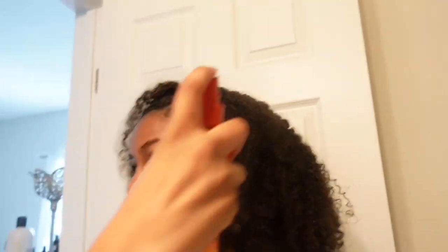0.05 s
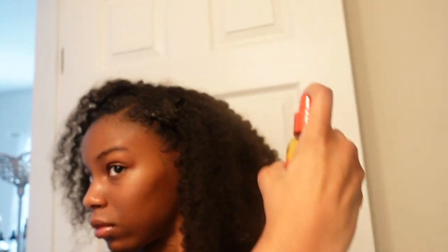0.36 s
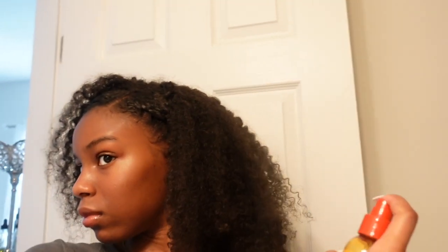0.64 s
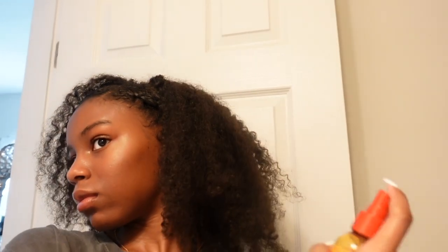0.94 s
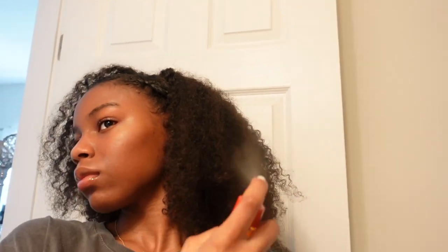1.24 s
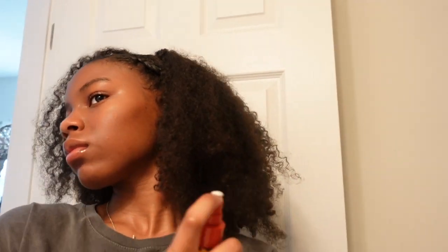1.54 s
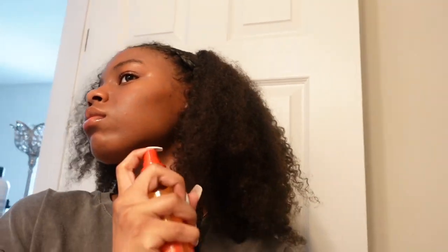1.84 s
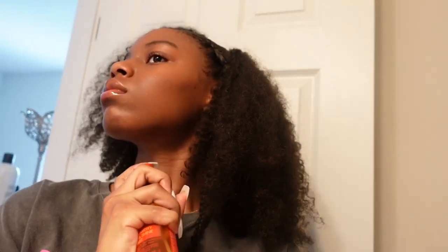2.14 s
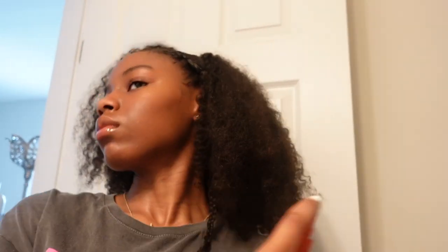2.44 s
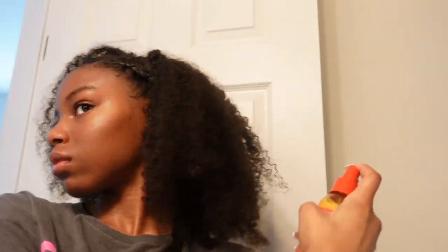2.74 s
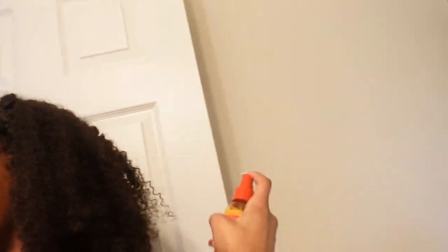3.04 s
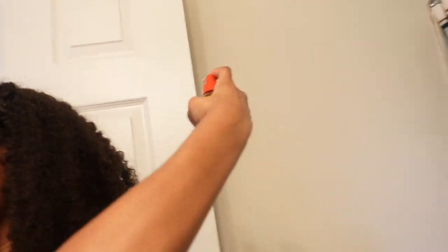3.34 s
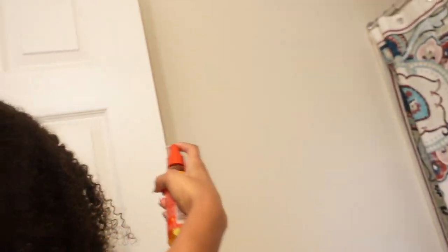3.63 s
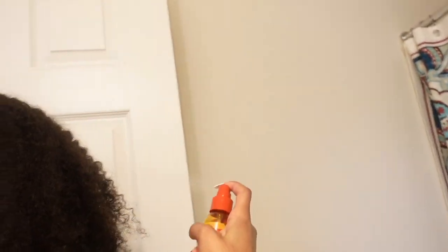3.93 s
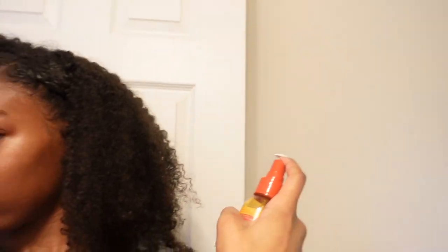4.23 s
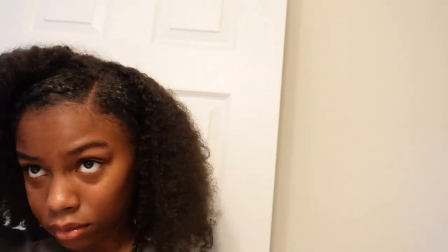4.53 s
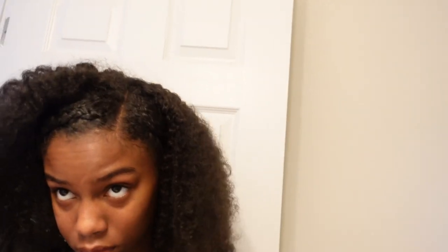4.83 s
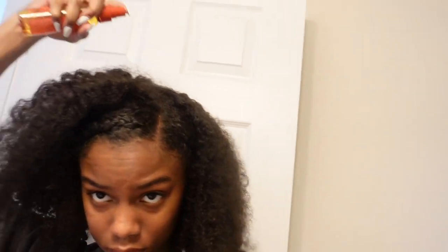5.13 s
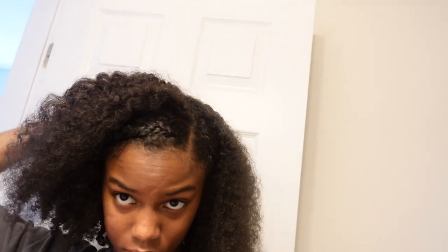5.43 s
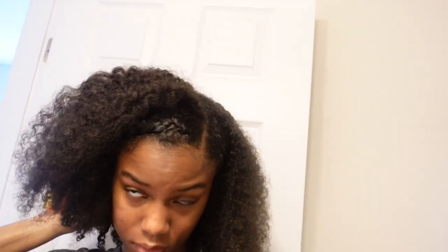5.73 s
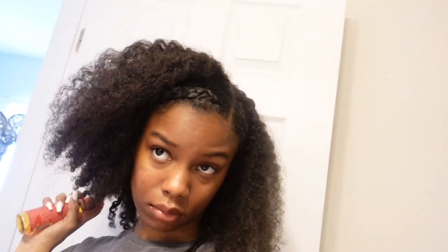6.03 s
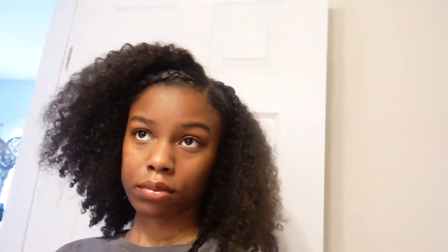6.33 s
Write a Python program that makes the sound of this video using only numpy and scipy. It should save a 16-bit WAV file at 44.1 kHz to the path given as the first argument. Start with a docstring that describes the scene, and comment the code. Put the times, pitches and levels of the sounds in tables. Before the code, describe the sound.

Quick, repeated spritzes from a hand-pump spray bottle, each a brief hiss amid ticking plastic, over faint indoor room tone.

```python
"""Pump spray in a bedroom

A small plastic pump bottle is sprayed sixteen times close to a stereo microphone, almost straight ahead.
The finger takes up the slack with a tick, the jet hisses and turns to fine mist as pressure builds, and
the plunger slides back to its stop and twangs the spring. The liquid plops, the seal squeaks and, mostly
late on, the bottle knocks in the hand. An appliance hum and faint room tone lie underneath."""
import sys
import numpy as np
from scipy import signal
from scipy.fft import rfft, irfft, next_fast_len
from scipy.io import wavfile
from scipy.ndimage import uniform_filter1d, map_coordinates

SR = 44100
rng = np.random.default_rng(int(sys.argv[2]) if len(sys.argv) > 2 else 0)


def master_out(mix):
    """Clip the mix to full scale and print it as 16-bit PCM to the path in sys.argv[1]."""
    frames = np.transpose(np.atleast_2d(mix))
    ceiling = np.clip(frames, -1, 1)
    pcm = np.round(ceiling * 32767).astype(np.int16)
    wavfile.write(sys.argv[1], SR, pcm)


N = 289737
T = np.arange(N) / SR
SIDE = np.array([[1], [-1]])   # adds to the left channel, subtracts from the right


def from_db(db):
    """Decibels to gain."""
    return 10 ** (np.asarray(db) / 20)


def rms_one(x):
    """Scale to rms 1."""
    return x / np.sqrt(np.mean(x ** 2) + 1e-20)


def at_hz(points, hz):
    """Read a table on a log-frequency axis."""
    rows = np.array(points, float)
    return np.interp(np.log(np.maximum(hz, 1)), np.log(rows[:, 0]), rows[:, 1])


def butter(x, order, hz, kind):
    """Apply a Butterworth filter."""
    return signal.sosfilt(signal.butter(order, hz, kind, fs=SR, output="sos"), x)


def colour(x, gain_at):
    """Filter by a gain that is a function of frequency."""
    size = next_fast_len(x.shape[-1])
    gain = gain_at(np.fft.rfftfreq(size, 1 / SR))
    return irfft(rfft(x, size) * gain, size)[..., :x.shape[-1]]


def noise(spectrum):
    """Noise of a given spectrum, rms 1."""
    return rms_one(colour(rng.standard_normal(N), lambda hz: from_db(at_hz(spectrum, hz))))


def drift(rate_hz):
    """A smooth random wander, rms 1."""
    return rms_one(colour(rng.standard_normal(N), lambda hz: 1 / (1 + (hz / rate_hz) ** 2)))


def gate(t, length_s, attack_s, release_s):
    """An envelope that rises, holds until length_s and dies away."""
    return (1 - np.exp(-t / attack_s)) * np.exp(-np.maximum(t - length_s, 0) / release_s)


def ring(x, hz, t60):
    """One damped mode: a unit click sets a sine of height 1 ringing."""
    radius, angle = from_db(-60 / (t60 * SR)), 2 * np.pi * hz / SR
    return signal.lfilter([0, np.sin(angle)], [1, -2 * radius * np.cos(angle), radius ** 2], x + 1e-18)


def add(track, s, sound):
    """Mix a sound into a track at time s."""
    at = int(np.clip(round(s * SR), 0, N - 1))
    track[at:at + len(sound)] += sound[:N - at]


def moving_echo(x, delay_s, sway, share):
    """A reflection off hand, head or door; its path changes as the arm moves."""
    lag = delay_s * np.exp(sway * drift(0.47)) * SR
    return share * map_coordinates(x, [np.arange(N) - lag], order=3)


def strike(contacts, modes, cycles, rattle_s, body_db, reach_octaves, snap_hz, crest_db):
    """A contact and its tiny rebounds snap, and ring one damped pitch and the modes near it."""
    out, t = np.zeros(N), np.arange(SR // 7) / SR
    for s, db, hz, snap_db, rattle_db in contacts:
        force = from_db(rattle_db - 14.5) * rng.standard_normal(len(t))
        force *= np.exp(-t / rattle_s) * (t > 0.001)
        force[0] = 1   # the contact itself, ahead of the rattle
        snap = from_db(snap_db + 6) * butter(force, 2, [snap_hz, 6800], "band")
        sound = ring(force, hz, cycles / hz) + snap
        for mode_hz, mode_db, t60 in modes:
            nearness = 1 / (1 + (np.log2(mode_hz / hz) / reach_octaves) ** 2)
            grip_detune = 1 + rng.normal(0, 0.008)
            sound += nearness * from_db(body_db + mode_db) * ring(force, mode_hz * grip_detune, t60)
        onset_rms = np.std(sound[:SR // 200])
        add(out, s, from_db(db - crest_db) * sound / onset_rms)
    return out


# spectrum of the quiet bedroom: (frequency [Hz], level [dB])
ROOM_TONE_SPECTRUM = [(18, -34), (30, -24), (118, -5.5), (404, -3), (569, -2), (1160, -6), (1460, -5.5),
                      (1810, -7.5), (2170, -11.5), (4420, -16.5), (4780, -17), (5170, -18.5), (5900, -19.5),
                      (9220, -22.5), (16000, -29.5)]
# how alike it is at the left and right microphones: (frequency [Hz], coherence [0-1])
ROOM_TONE_COHERENCE = [(60, 0.5), (110, 0.64), (170, 0.08), (400, 0), (900, 0), (2000, 0), (8000, .4)]
def room_tone(level_db=-62.5):
    """Soft noise from all round the microphone, widest in the low mids."""
    def side_gain(hz):
        coherence = at_hz(ROOM_TONE_COHERENCE, hz)
        return np.sqrt((1 - coherence) / (1 + coherence))
    side = colour(noise(ROOM_TONE_SPECTRUM), side_gain)
    return from_db(level_db) * (noise(ROOM_TONE_SPECTRUM) + side * SIDE)


# swell and fade of the hum: (time [s], relative level [dB])
HUM_LEVELS = [(0.0, -73), (0.38, -85), (1.59, -66), (1.94, -79), (3.46, -75.5), (5.01, -85), (5.8, -66.5),
              (6.5, -70), (6.57, -80)]
def appliance_hum(hz=104, trim_db=-0.5, motor_db=-14):
    """An appliance in the background: a wavering hum with a faint line an octave below."""
    level_db = np.interp(T, *np.transpose(HUM_LEVELS)) + trim_db + 1.8 * drift(4.3)
    phase = 2 * np.pi * np.cumsum(hz + 2 * drift(5.9)) / SR
    return from_db(level_db) * np.sqrt(2) * (np.sin(phase) + from_db(motor_db) * np.sin(phase / 2))


# the finger takes up the slack: (time [s], tick level [dB], wait until the head seats [s])
TAKE_UPS = [(0.1612, -37, 0.045), (0.5385, -26, 0.018), (0.7939, -25.5, 0.019), (1.0927, -29, 0.0085),
            (1.8243, -27.5, 0.031), (2.1587, -25.5, 0.017), (2.727, -30.5, .048), (3.1005, -22.5, .007),
            (3.3711, -28.5, 0.02)]
# the plunger slides back to its stop:
# (stop time [s], slide length [s], relative slide level [dB], stop level [dB], twang level [dB])
RETURNS = [(0.488, 0.034, -45.5, -39, -45), (0.7357, 0.029, -44, -32.5, -49), (0.978, 0.036, -47, -31, -41),
           (1.5253, .1, -54.5, -30, -66), (2.0884, 0.04, -46.5, -38, -61), (2.3654, 0.023, -43, -31.5, -56),
           (3.024, 0.034, -48, -37, -47.5), (3.3026, 0.096, -48, -28, -57),
           (3.3968, 0.019, -52.5, -27, -60), (3.594, 0.027, -42, -52, -69), (3.69, .03, -53, -32, -64),
           (3.8798, 0.038, -44.5, -34, -58), (3.942, 0.025, -42.5, -29, -57), (4.143, 0.04, -46, -47, -62),
           (5.737, .015, -44.5, -43, -62), (6.213, 0.04, -49, -50, -62)]
def plunger(overrun_s=0.0035, take_up_s=0.023, take_up_db=-25):
    """The seal rubs along its barrel with a grainy hiss, on the way back and at each take-up."""
    slides = [(stop - length, length + overrun_s, db) for stop, length, db, *_ in RETURNS]
    slides += [(s, take_up_s, db + take_up_db) for s, db, _ in TAKE_UPS]
    level, t = np.zeros(N), np.arange(SR // 5) / SR
    for s, length, db in slides:
        add(level, s, from_db(db) * gate(t, length, attack_s=0.0049, release_s=0.014))
    return seal_rub(level)


# spectrum of the seal on its barrel: (frequency [Hz], level [dB])
RUB_SPECTRUM = [(400, -20.5), (1400, 0.5), (2300, 1.5), (3100, 4), (4500, -3), (7000, -1.5), (12000, -8.5),
                (16000, -27)]
def seal_rub(level):
    """Grainy friction noise that follows a level curve, with one close reflection."""
    rub = level * noise(RUB_SPECTRUM) * from_db(-4 + 3.3 * drift(190))
    return rub + moving_echo(rub, delay_s=0.000832, sway=0.21, share=0.4)


# the grip shifts or the head snaps down: (time [s], level [dB], pitch [Hz], relative snap [dB])
HANDLING_CLICKS = [(0.3008, -25, 1670, -20), (.466, -32.5, 4340, 18), (1.1014, -32, 3200, 20),
                   (1.1611, -31, 1250, -14), (1.2639, -25.5, 2380, 5), (1.42, -32.5, 1440, 7),
                   (1.5438, -31.5, 1110, 2), (1.6641, -29.5, 1404, 0), (1.699, -25, 1510, -8),
                   (1.7272, -32.5, 1480, 11), (2.2004, -22, 3440, -14), (2.9906, -31, 1410, -16),
                   (4.125, -25.5, 4250, 8), (4.7523, -26.5, 4700, -24), (4.7858, -29, 1800, -20),
                   (5.1724, -28, 2240, 6), (5.4436, -31.5, 2250, -18), (6.3333, -38, 3000, 10),
                   (6.55, -38.5, 3100, -5)]
# modes of the pump and cap: (frequency [Hz], level [dB], t60 [s])
PUMP_MODES = [(846, -26, 0.0095), (1380, -10, 0.056), (1510, -8, 0.012), (2265, -1.5, 0.037),
              (2860, -2, 0.059), (3050, 2.5, 0.014), (3210, 2.5, .018), (3680, 3, 0.008),
              (5140, 2.5, 0.015), (6470, -33, .012)]
def clicks():
    """Small stiff pump parts tick and die at once: bright at take-up, duller as they seat or stop."""
    # each contact: (time [s], level [dB], pitch [Hz], relative snap [dB], relative rattle [dB])
    ticks = [(s, db, 3300, -2, -9) for s, db, _ in TAKE_UPS]
    seats = [(s + wait, db - 4, 1680, -4, -3.5) for s, db, wait in TAKE_UPS]
    stops = [(s, db, 1500, 0, -14.5) for s, _, _, db, _ in RETURNS]
    handling = [(s, db, hz, snap_db, -10.5) for s, db, hz, snap_db in HANDLING_CLICKS]
    sound = strike(ticks + seats + stops + handling, PUMP_MODES, cycles=4.5, rattle_s=0.016,
                   body_db=-11, reach_octaves=0.68, snap_hz=2310, crest_db=16)
    return butter(sound, 2, 650, "high")


def spring(low_hz=1419, high_hz=2994, t60=0.1, low_db=-1.5, tick_db=-21.5):
    """Both modes of the coil ring on after a stop; a take-up tick stirs only the high one."""
    stops, ticks = np.zeros((2, N))
    for s, *_, db in RETURNS:
        add(stops, s, from_db([db]))
    for s, db, _ in TAKE_UPS:
        add(ticks, s, from_db([db + tick_db]))
    return from_db(low_db) * ring(stops, low_hz, t60) + ring(stops + ticks, high_hz, t60)


# liquid plopping in the bottle: (time [s], level [dB], starting pitch [Hz], swell [s])
PLOPS = [(.232, -40.5, 596, 0.015), (.38, -48.5, 580, 0.0039), (1.884, -46, 570, 0.0032),
         (2.201, -39, 736, 0.0032), (2.571, -46.5, 542, 0.0098), (2.979, -39.5, 483, .002),
         (2.983, -52.5, 172, 0.0018), (2.989, -48, 390, .001), (3.474, -41, 580, .002),
         (4.246, -44.5, 464, 0.00083), (4.25, -57, 162.7, .004), (4.538, -47.5, 505, .009)]
def plops(rise=0.48, decay_cycles=1.5):
    """An air pocket in the liquid swells, rings briefly and rises a little in pitch."""
    out, t = np.zeros(N), np.arange(SR // 12) / SR
    for s, db, hz, swell_s in PLOPS:
        swell = np.minimum(t / swell_s, 1) ** 0.33
        decay = np.exp(-np.maximum(t - swell_s, 0) * hz / decay_cycles)
        add(out, s, from_db(db) * swell * decay * np.sin(2 * np.pi * hz * t * (1 + rise * t)))
    return out


def flow(start, crest, end, open_db, crest_db, build_s, attack_s, shut_s, sag_db=6):
    """The valve opens, pressure builds to a crest, and the flow dies when the plunger bottoms out."""
    t = np.arange(int((end - start + 0.1) * SR)) / SR + start
    build = np.exp(np.minimum(t - crest + 0.005, 0) / build_s)
    sag = np.clip((t - crest) / (end - crest), 0, 1)
    level_db = open_db + (crest_db - open_db) * build - sag_db * sag
    return from_db(level_db) * gate(t - start, end - start, attack_s, shut_s)


# presses of the pump, in relative levels: (start [s], crest [s], end [s], opening jet [dB],
# crest jet [dB], opening mist [dB], crest mist [dB], sizzle [dB])
PRESSES = [(0.299, 0.35, 0.39, -42.5, -45.5, -49, -47, -55),
           (0.586, 0.622, 0.656, -40.5, -39.5, -45, -35.5, -31),
           (.836, 0.894, 0.92, -40.5, -42.5, -42, -41, -41),
           (1.268, 1.323, 1.365, -43, -40.5, -41.5, -40.5, -39),
           (1.914, 1.957, 2.016, -42, -45.5, -51, -41.5, -54),
           (2.202, 2.255, 2.277, -45, -39, -40.5, -37, -42),
           (2.842, 2.901, 2.958, -44, -39, -46, -41.5, -33),
           (3.146, 3.199, 3.208, -39, -39, -45, -32.5, -36),
           (3.419, 3.465, 3.523, -39, -43, -41.5, -42, -27),
           (3.716, 3.781, 3.82, -44.5, -39, -44, -38.5, -36),
           (3.96, 4.017, 4.065, -41, -36, -42.5, -39.5, -33.5),
           (4.939, 5.016, 5.05, -43.5, -38.5, -46, -39, -34.5),
           (5.212, 5.305, 5.41, -39, -42.5, -44.5, -51.5, -36),
           (5.479, 5.53, 5.64, -45, -39, -49.5, -47, -45),
           (5.765, 5.825, 5.89, -43.5, -43, -52, -42, -31.5),
           (6.028, 6.071, 6.12, -44.5, -44, -46.5, -40, -30.5)]
# spectra of the coarse drops, the jet and the mist at close range: (frequency [Hz], level [dB])
SPUTTER_SPECTRUM = [(100, -60), (300, -14), (600, -7.5), (900, -7), (1350, 0), (2000, 0), (2700, -10),
                    (5000, -48)]
JET_SPECTRUM = [(1300, -43), (2000, -7.5), (2600, -2), (3600, 0), (5000, 1), (6500, -1), (7800, -9.5),
                (9500, -5.5), (14000, -32)]
MIST_SPECTRUM = [(5000, -22.5), (7300, -1.5), (8600, -2), (10300, -2), (12000, -2.5), (13500, -3.5),
                 (15000, -8.5), (16000, -12)]
def spray():
    """Coarse drops sputter, the jet hisses, and fine mist adds the top at full pressure."""
    jet, mist = np.zeros((2, N))
    for start, crest, end, jet_open, jet_crest, mist_open, mist_crest, _ in PRESSES:
        times = start, crest, end
        add(jet, start, flow(*times, jet_open, jet_crest, build_s=0.037, attack_s=0.0027, shut_s=0.0057))
        add(mist, start, flow(*times, mist_open, mist_crest, build_s=0.01, attack_s=0.0032, shut_s=0.015))
    sputter = jet * from_db(-10.5 - 0.58 * T)   # coarse drops grow fewer as the pump is primed
    hiss = sputter * noise(SPUTTER_SPECTRUM) * from_db(2.7 * drift(210))
    hiss += jet * noise(JET_SPECTRUM) * from_db(-0.5 + 1.1 * drift(270))
    hiss += mist * noise(MIST_SPECTRUM) * from_db(-0.65 + 2.24 * drift(300))
    near_echo = moving_echo(hiss, delay_s=0.000685, sway=0.297, share=0.27)
    far_echo = moving_echo(hiss, delay_s=0.0024, sway=0.163, share=0.15)
    return hiss + near_echo + far_echo


def spits(hiss, per_s=45, size_db=10, band_hz=(2500, 12000)):
    """Now and then a bigger drop bursts at the nozzle, its strength following the hiss."""
    drive = np.sqrt(np.abs(uniform_filter1d(hiss ** 2, SR // 100)))   # rms over 10 ms
    drops = (rng.random(N) < per_s / SR) * rng.uniform(0.94, 2, N) * drive
    return from_db(size_db) * butter(drops, 1, band_hz, "band")


# the bottle knocks in the hand: (time [s], level [dB], pitch [Hz], gap to the first rebound [s])
KNOCKS = [(.3008, -26, 2330, 0.00086), (3.799, -24, 1660, 0.0044), (4.0438, -20, 1380, .007),
          (5.135, -34, 1890, .004), (5.3048, -14.5, 1730, .0062), (5.3824, -28, 1890, .005),
          (5.5782, -17, 2040, 0.0097), (5.637, -29, 2100, .006), (5.723, -28, 2230, .006),
          (5.9205, -23.5, 2050, .0095), (6.164, -35.5, 1870, .004)]
# rebounds of a hard knock: (delay [gaps], level re the knock [dB], relative snap [dB])
REBOUNDS = [(1, -7.5, 0), (2.601, -6.5, -17)]
# modes of the hollow bottle: (frequency [Hz], level [dB], t60 [s])
BOTTLE_MODES = [(1466, -37, 0.023), (1678, -2.5, 0.066), (1874, -12, 0.066), (1980, -2, 0.11),
                (2034, -2.5, 0.2), (2237, 1.5, 0.045), (2650, -35, .02), (3830, -22, .02),
                (5340, 14, 0.065), (6880, -46, .025)]
def knocks(hard_db=-14, rattle_db=-8):
    """The hand damps the ring of a bottle too small to radiate bass; each knock rebounds twice."""
    contacts = []
    for s, db, hz, gap in KNOCKS:
        force_db = db - hard_db   # a softer knock has less snap and weaker rebounds
        contacts.append((s, db, hz, 10 + 1.2 * force_db, rattle_db))
        for delay, loss_db, snap_db in REBOUNDS:
            contacts.append((s + delay * gap, db + loss_db + 0.2 * force_db, hz, snap_db, rattle_db))
    blows = strike(contacts, BOTTLE_MODES, cycles=11, rattle_s=0.0077,
                   body_db=-22, reach_octaves=0.71, snap_hz=3160, crest_db=11)
    return butter(blows, 6, 1240, "high")


# spectrum of the finest droplets at the nozzle: (frequency [Hz], level [dB])
SIZZLE_SPECTRUM = [(7000, -40), (10000, -5), (11300, -0.5), (12000, 4.5), (13000, -3), (14200, -4),
                   (16000, -9)]
def sizzle(lead_s=0.015, length_s=0.026, fade_db=5.5):
    """Just before each crest the liquid sheet breaks into the finest droplets, then eases off."""
    level, t = np.zeros(N), np.arange(SR // 6) / SR
    fade = from_db(-fade_db * np.minimum(t / length_s, 1))
    shape = fade * gate(t, length_s, attack_s=0.0024, release_s=0.0066)
    for _, crest, *_, db in PRESSES:
        add(level, crest - lead_s, from_db(db) * shape)
    hiss = level * noise(SIZZLE_SPECTRUM) * from_db(-3 + 1.5 * drift(300))
    return hiss + moving_echo(hiss, delay_s=0.0013, sway=0.25, share=0.28)


# squeaks of the seal: (time [s], length [s], level [dB], pitch [Hz])
SQUEAKS = [(0.463, 0.0056, -40, 4200), (0.72, 0.033, -54, 6800), (1.519, 0.022, -52.5, 4680),
           (2.346, 0.028, -52.5, 5600), (4.122, 0.028, -43, 4090)]
def squeaks(width_hz=260):
    """The seal sticks and slips, and chirps roughly around one pitch."""
    out, t = np.zeros(N), np.arange(SR // 12) / SR
    for s, length, db, hz in SQUEAKS:
        chirp = colour(rng.standard_normal(len(t)), lambda f: 1 / (1 + ((f - hz) / width_hz) ** 2))
        add(out, s, from_db(db) * rms_one(chirp) * gate(t, length, attack_s=0.0018, release_s=0.004))
    return out


def glance(x, from_hz=7500):
    """Short waves glance off hand and hair and reach the two microphones differently."""
    treble = butter(x, 2, from_hz, "high")
    return moving_echo(treble, delay_s=0.0013, sway=0.22, share=0.32) * SIDE


# decay of the bedroom: (frequency [Hz], t60 [s])
ROOM_T60 = [(300, 1), (1300, 0.58), (3500, 0.97), (8000, 0.65), (15000, 0.66)]
# its tail at the microphone: (frequency [Hz], level [dB])
ROOM_TAIL = [(300, -12.5), (1300, -6), (3500, -9), (8000, -9), (15000, -17)]
# its stereo width: (frequency [Hz], side re mid [0-1])
ROOM_WIDTH = [(300, 0.9), (700, 1), (2000, 0.49), (4500, 0.46), (9000, 0.57), (14000, 0.6)]
def room_response(onset_s=0.0026, early_db=-9, early_s=0.036):
    """Dense early reflections and a tail that dies band by band, partly alike in both channels."""
    t = np.arange(SR // 2) / SR
    edges, response = np.geomspace(120, 17000, 11), 0
    white = rng.standard_normal((2, 2, len(t)))
    early = np.exp(-t / early_s)
    early *= from_db(early_db) / np.linalg.norm(early)
    for band, (low, high) in enumerate(zip(edges, edges[1:])):
        hz = np.sqrt(low * high)
        late = from_db(-60 * t / at_hz(ROOM_T60, hz))
        late *= from_db(at_hz(ROOM_TAIL, hz)) / np.linalg.norm(late)
        mid, side = butter(white[band % 2], 2, [low, high], "band")
        response += np.hypot(late, early) * (mid + at_hz(ROOM_WIDTH, hz) * side * SIDE)
    return response * np.minimum(t / onset_s, 1) ** 2


def bedroom(x, spots=5):
    """As the arm travels, the bottle passes from one spot's reflections to the next's."""
    wet, place = 0, np.linspace(0, spots - 1, N)
    for spot in range(spots):
        nearness = np.sqrt(np.maximum(1 - np.abs(place - spot), 0))
        wet += signal.fftconvolve((x * nearness)[None], room_response(), axes=1)[:, :N]
    return wet


# where the hand holds the bottle before the microphone: (time [s], left minus right [dB])
BOTTLE_PAN = [(0.3, -1), (0.8, -3), (1.3, -0.5), (2.2, 0), (2.9, -2), (3.3, 0.5), (3.8, -0.2), (4.1, -0.5),
              (4.9, .8), (5.4, -0.5), (6.1, 0.5)]
def scene():
    """The bottle moves about the head, close to the microphone and near centre, with the room behind."""
    hiss = spray() + sizzle() + plunger()
    bottle = hiss + spits(hiss) + squeaks() + clicks() + spring() + knocks() + plops()
    pan = from_db(np.interp(T, *np.transpose(BOTTLE_PAN)) * SIDE / 2)
    return bottle * pan + glance(bottle) + bedroom(bottle) + room_tone() + appliance_hum()


def record(dry, low_cut_hz=47, high_cut_hz=15900):
    """The microphone drops the deep bass; the top is cut steeply."""
    high_cut = signal.ellip(12, 0.1, 80, high_cut_hz, fs=SR, output="sos")
    return signal.sosfilt(high_cut, butter(dry, 8, low_cut_hz, "high"))


dry = scene()
out = record(dry)
master_out(out)
```